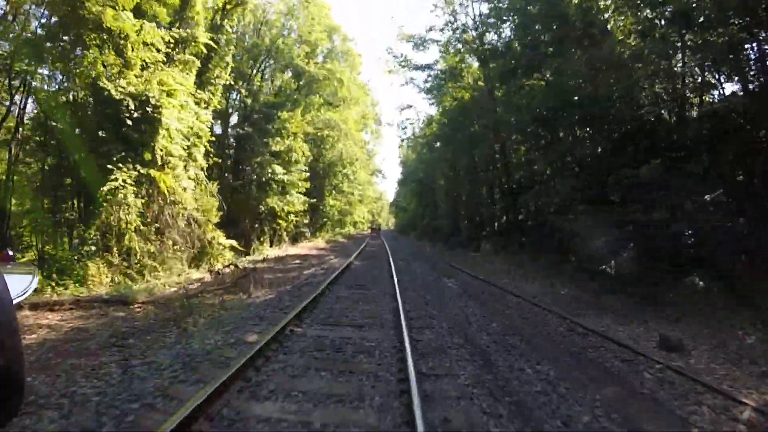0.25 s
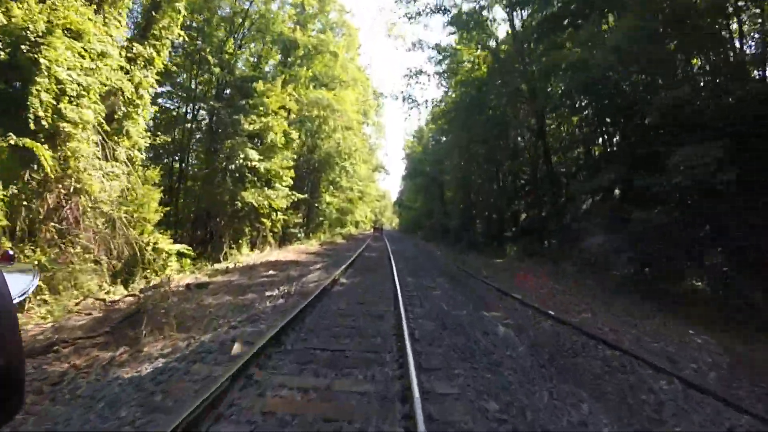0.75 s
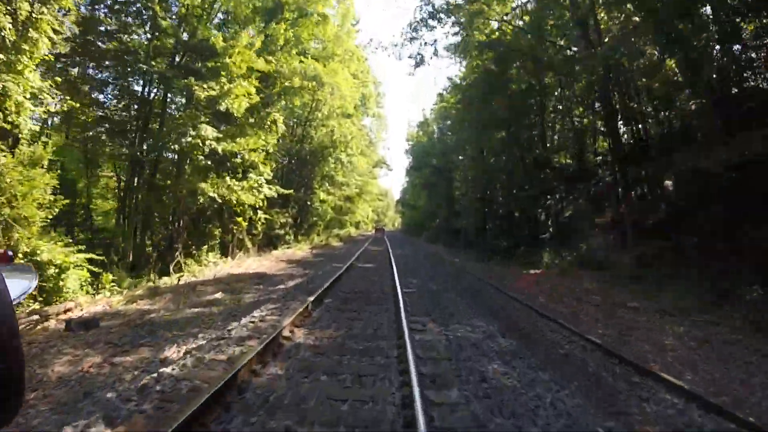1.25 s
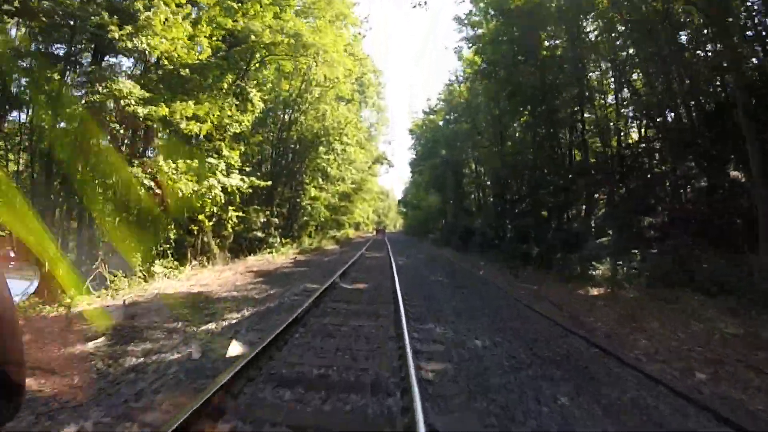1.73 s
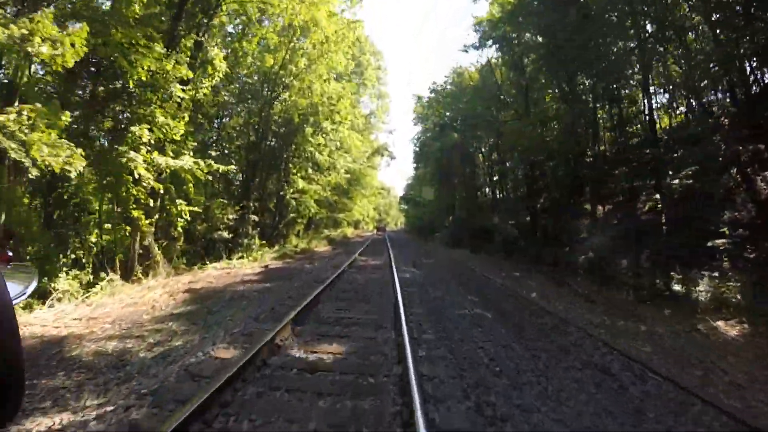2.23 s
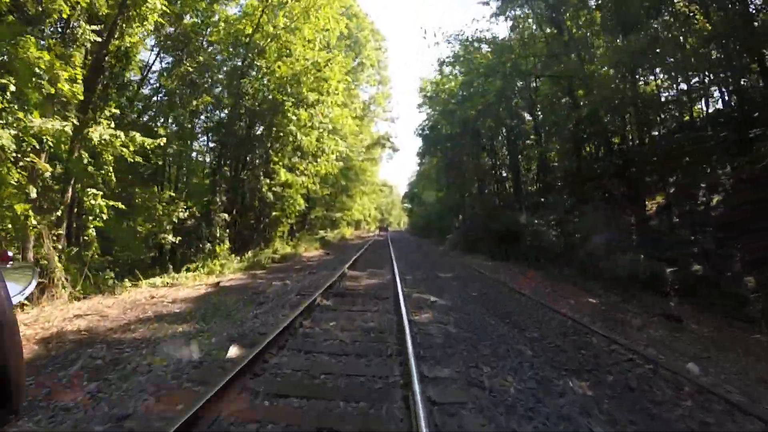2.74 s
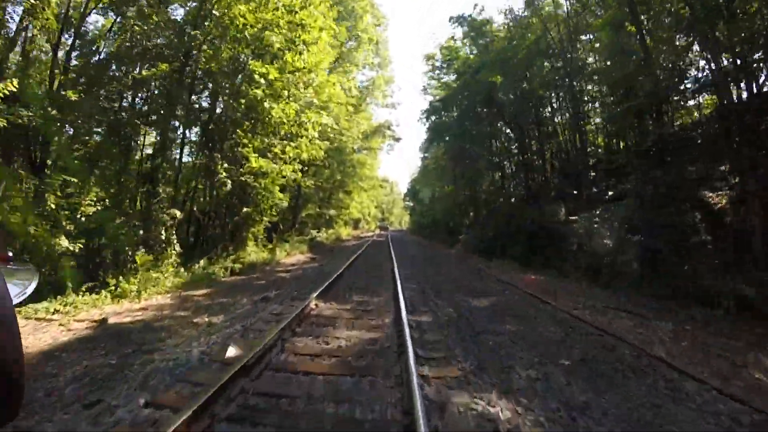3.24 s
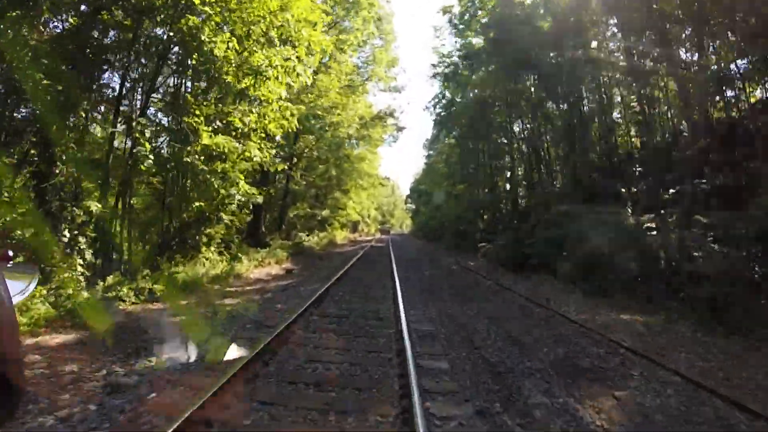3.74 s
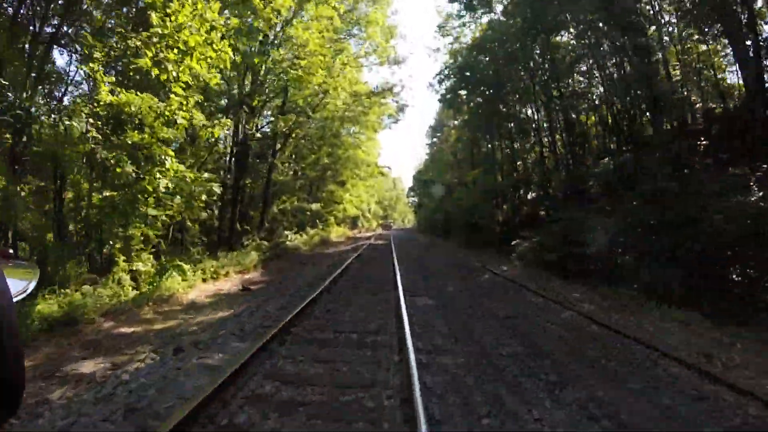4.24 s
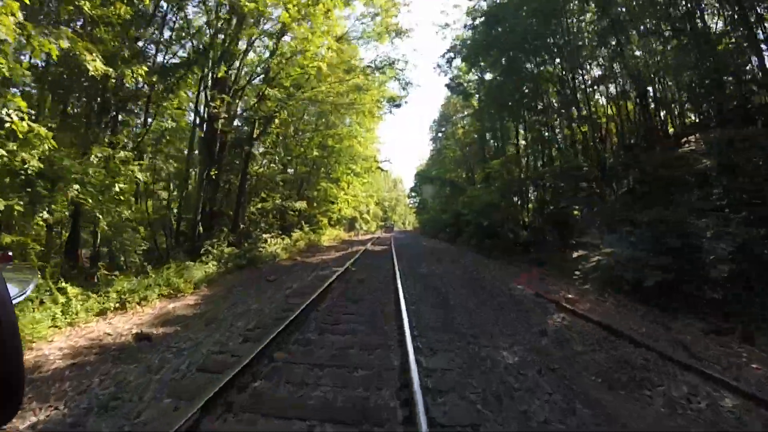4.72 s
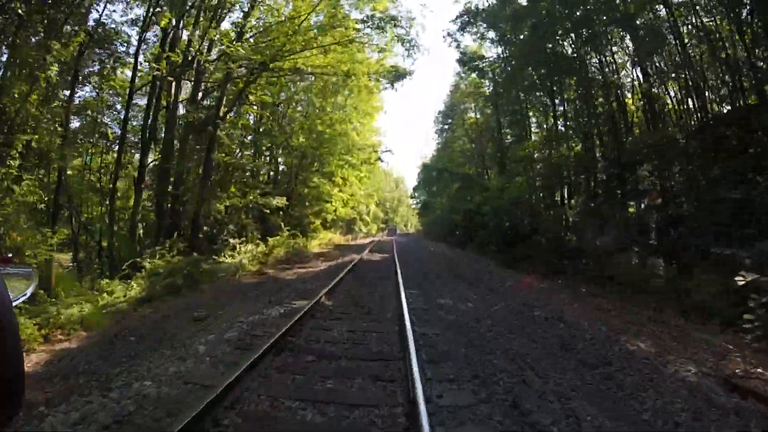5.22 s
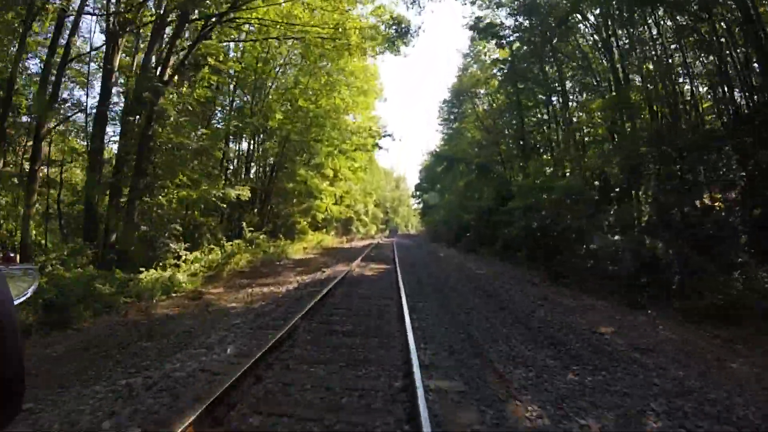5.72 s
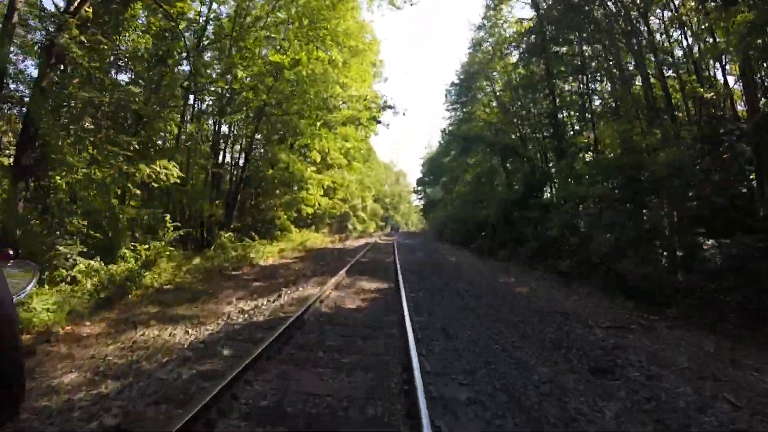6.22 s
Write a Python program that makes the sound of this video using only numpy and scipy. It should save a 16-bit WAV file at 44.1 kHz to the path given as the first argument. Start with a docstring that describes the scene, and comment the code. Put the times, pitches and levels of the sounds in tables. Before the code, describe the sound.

Steady chugging of a little motor rail car, about sixteen thuddy pops a second, over rumbling wheels, clattering sheet metal and rail-joint knocks.

```python
"""In the woods, on a small open rail car. A slow four-stroke engine fires about sixteen times a second:
each firing gives a low push of pressure and a short ring of the exhaust pipe. Steel wheels roar on the rails,
the frame shakes and rattles with every stroke, and both axles knock over the rail joints. Noise sent through
ringing filters makes most of these sounds. A closed housing around the microphone dulls the treble."""
import sys
import numpy as np
from scipy import signal
from scipy.fft import rfft, irfft
from scipy.io import wavfile
from scipy.ndimage import uniform_filter1d

SR = 44100
rng = np.random.default_rng(int(sys.argv[2]) if len(sys.argv) > 2 else 0)


def generate_wav(signal):
    """Clip the signal to [-1, 1] and save it as 16-bit WAV at the path in sys.argv[1]."""
    frames = np.transpose(np.atleast_2d(signal))
    scaled = np.clip(frames, -1, 1) * 32767
    pcm = np.round(scaled).astype(np.int16)
    wavfile.write(sys.argv[1], SR, pcm)


N = 285322   # length in samples


def from_db(db):
    """Turn decibels into a factor."""
    return 10 ** (np.asarray(db) / 20)


def rms_one(x):
    """Bring a signal to an rms level of 1."""
    return x / np.sqrt(np.mean(x ** 2) + 1e-20)


def in_time(rows):
    """Join the columns of a table by straight lines, one value a sample."""
    s, *columns = np.transpose(rows)
    return [np.interp(np.arange(N) / SR, s, column) for column in columns]


def at_hz(points, hz):
    """Read a (frequency, level) table at any frequency, along a log frequency scale."""
    known_hz, level_db = np.transpose(points)
    return np.interp(np.log(hz), np.log(known_hz), level_db)


def drift(rate_hz):
    """A slow random wander of spread 1, made at every 40th sample and joined by straight lines."""
    r = np.exp(-80 * np.pi * rate_hz / SR)
    slow = signal.lfilter([1], [1, -2 * r, r * r], rng.standard_normal(N // 40 + 2002))
    slow = rms_one(slow[2000:])   # leave out the filter's start
    return np.interp(np.arange(N) / 40, np.arange(len(slow)), slow)


def filtered(x, order, hz, kind):
    """Keep the part of a sound below, above or between the given frequencies."""
    return signal.sosfilt(signal.butter(order, hz, kind, fs=SR, output="sos"), x)


def ring(drive, hz, t60):
    """One tone of a struck or rubbed body, dying by 60 dB in t60 s; for noise, ring time hardly alters the level."""
    r, w = from_db(-60 / (t60 * SR)), 2 * np.pi * hz / SR
    return np.sqrt(1 - r) * signal.lfilter([0, np.sin(w)], [1, -2 * r * np.cos(w), r * r], drive + 1e-18)


def swelling_contacts(blows, peak_s):
    """Turn each blow into a short burst of noise that swells until peak_s, then dies; also return its pole."""
    r = np.exp(-1 / (peak_s * SR))
    return signal.lfilter([1], [1, -2 * r, r * r], blows) * rng.standard_normal(N), r


def firings_so_far():
    """Count the firings as a running number; the engine gains speed evenly."""
    first_firing_s, firings_per_s, speedup_per_s2 = 0.02225, 15.98303, 0.148969
    t = np.arange(N) / SR - first_firing_s
    return firings_per_s * t + speedup_per_s2 * t ** 2 / 2


def from_place(fired, place):
    """Distance from a place in the engine cycle, -0.5 to 0.5 cycles."""
    return (fired - place + .5) % 1 - .5


# Surges of rail growl and head wind: (time [s], growl level [dB], wind level [dB])
RIDE_SURGES = [(0, -27.5, -38), (.8, -31.5, -40), (1.7, -24.5, -44), (2.3, -32, -35.5), (3.2, -26, -41),
               (3.9, -25.5, -43), (4.4, -28, -32.5), (5.1, -28, -45.5), (5.4, -24, -33), (5.65, -24, -50),
               (6.2, -23, -43), (6.47, -22.5, -55)]


def wind():
    """Lumpy pressure of the head wind on the housing: very low noise in surges."""
    _, wind_db = in_time(RIDE_SURGES)
    return from_db(wind_db) * rms_one(filtered(rng.standard_normal(N), 2, [27, 40], "band"))


def rail_growl():
    """The rolling contact keeps a low tone of wheel and rail sounding in surges."""
    growl_db, _ = in_time(RIDE_SURGES)
    return from_db(growl_db + 1.9 * drift(4.0)) * rms_one(ring(rng.standard_normal(N), 287.6, 0.035))


# A thin plate sings briefly: (time [s], level [dB], length [s])
PLATE_PINGS = [(1.08, -51, .02), (1.18, -50, 0.011), (2.408, -53, .026)]


def pings():
    """The plate is rubbed for a moment; its tone rises and fades softly."""
    ping_hz = 3485
    t, drive = np.arange(N) / SR, 0
    for s, db, length_s in PLATE_PINGS:
        drive = drive + from_db(db) * ((t > s) & (t < s + length_s))
    return signal.lfilter([.01], [1, -.99], drive) * np.sin(2 * np.pi * ping_hz * t)


# Blows of the valve gear: (place after the firing [cycles], level before the contacts build up [dB])
VALVE_BLOWS = [(-.05, -77), (.45, -82)]
# Tones of the valve gear: (frequency [Hz], level [dB], ring time t60 [s])
VALVE_TONES = [(5040, -9, 0.0079), (6400, -11, 0.0054), (7500, -11, 0.0061), (8900, -13, 0.0063),
               (10300, -15, 0.0047)]


def valve_ticks(fired):
    """Twice a cycle the valve gear gives a few milliseconds of bright contacts, each time of another strength."""
    blows = np.zeros(N)
    for place, level_db in VALVE_BLOWS:
        at = np.flatnonzero(np.diff(np.floor(fired - place)) > 0)
        blows[at] = from_db(level_db + 1.1 * rng.standard_normal(len(at)))
    contacts, _ = swelling_contacts(blows, peak_s=.002)
    rings = sum(from_db(db) * ring(contacts, hz, t60) for hz, db, t60 in VALVE_TONES)
    return filtered(rings, 2, [4000, 10500], "band")


# Breath of the intake: (frequency [Hz], width [Hz], level before the valve shapes it [dB])
INTAKE_BREATH = [(665, 160, -35), (832, 190, -35), (1600, 250, -51.5)]


def intake(fired):
    """Air rushes through the intake while its valve is open."""
    opens, shuts = .5, .9   # cycles after the firing
    opening = np.sin(np.pi * np.clip((fired % 1 - opens) / (shuts - opens), 0, 1)) ** .5
    out = 0
    for hz, width_hz, db in INTAKE_BREATH:
        breath = rms_one(ring(rng.standard_normal(N), hz, 2.2 / width_hz))
        out = out + from_db(db + 2.0 * drift(12)) * opening * breath
    return out


# Dull clacks of the engine: (place after the firing [cycles], length [cycles], frequency [Hz], level [dB])
ENGINE_CLACKS = [(0.48, 0.082, 1700, -45.5), (.93, 0.026, 1300, -40.5), (0.98, 0.015, 820, -47.5),
                 (0.12, 0.035, 3100, -57.5)]


def clacks(fired):
    """Gear and valve play knock at fixed places of the cycle, now harder, now softer."""
    out = 0
    for place, length, hz, db in ENGINE_CLACKS:
        bump = np.exp(-(from_place(fired, place) / length) ** 2)
        knocking = rms_one(ring(rng.standard_normal(N), hz, 0.0038))
        out = out + bump * from_db(db + 1.1 * drift(7.1)) * knocking
    return out


def panel_buzz():
    """A panel chatters briefly after a knock: a short even run of ticks rings two tones."""
    start_s, length_s, ticks_per_s, level_db = 3.853, .036, 295, -27
    ticks, since = np.zeros(N), np.arange(0, length_s, 1 / ticks_per_s)
    strengths = np.sin(np.pi * since / length_s) ** .5
    ticks[((start_s + since) * SR).astype(int)] = from_db(level_db) * strengths
    return ring(ticks, 3400, .005) - ring(ticks, 4400, .005)


# A loose metal fitting jumps over the roughest joint: (time [s], level [dB])
FITTING_JUMPS = [(4.362, -49), (4.372, -45), (4.434, -53), (4.446, -48), (4.457, -48), (4.466, -49),
                 (4.475, -48), (4.484, -51), (4.492, -46), (4.518, -55)]
# Tones of the fitting: (frequency [Hz], level [dB], ring time t60 [s])
FITTING_TONES = [(4040, 2, .008), (4500, 1.5, 0.0093), (5240, 0, .008), (7600, -5, .012), (8860, -4, .012),
                 (9700, -9, .008), (10500, -9, .008), (12000, -15, .005)]


def fitting():
    """Each jump is a short scuff that strikes every tone of the fitting with a strength of its own."""
    s, jump_db = np.transpose(FITTING_JUMPS)
    chance, out = rng.standard_normal((len(s), len(FITTING_TONES))), 0
    for k, (hz, level_db, t60) in enumerate(FITTING_TONES):
        blows = np.zeros(N)
        blows[(s * SR).astype(int)] = from_db(jump_db + level_db + 3.2 * chance[:, k])
        contacts, r = swelling_contacts(blows, peak_s=.002)
        scuffs = contacts * (1 - r) * np.e   # the swell peaks at the strength of the blow
        out = out + ring(scuffs, hz, t60)
    return out


def stroke(fired, rise, fall, rebound, rebound_fall):
    """Shape of the shaking: a quick rise at the firing, a slower fall, a smaller blow a revolution later."""
    def hump(place, dies):
        off = from_place(fired, place)
        return np.exp(-(off / np.where(off < 0, rise, dies)) ** 2)
    return hump(-.045, fall) + rebound * hump(.5, rebound_fall)


# Lift of the noise per unit of stroke shape: (frequency [Hz], lift [dB])
STROKE_LIFT = [(200, 6), (380, 0.5), (520, -2.6), (800, 7.5), (2000, 1), (5000, 4), (10000, 6.5)]


def shaken(source, spectrum, peaks, shape, patchy_db):
    """Colour the source, then lift each half-octave band with the stroke and let it flicker; rms 1."""
    hz = np.maximum(np.fft.rfftfreq(N, 1 / SR), 1)
    level_db = at_hz(spectrum, hz)
    for centre, width, db in peaks:
        level_db = level_db + db / (1 + (2 * (hz - centre) / width) ** 2)
    coloured, out, together = rfft(source) * from_db(level_db), 0, drift(61)
    lowest_hz, highest_hz = spectrum[0][0], spectrum[-1][0]
    for centre in lowest_hz * 2 ** np.arange(0, np.log2(highest_hz / lowest_hz) + .5, .5):
        band = np.cos(np.pi * np.clip(np.log2(hz / centre), -.5, .5)) ** 2
        flicker_db = patchy_db * (0.65 * together + drift(25))   # partly shared by all bands
        gain_db = at_hz(STROKE_LIFT, centre) * (shape - shape.mean()) + flicker_db
        out = out + from_db(gain_db) * irfft(coloured * band, N)
    return rms_one(out)


def rattle_contacts(shape):
    """Loose parts tick against the frame, most often at the strokes, over an even hiss."""
    born = rng.random(N) < 900 * (shape + .15) / SR
    sizes = from_db(0.9 * np.minimum(rng.exponential(1, N), 4)) * rng.choice([-1, 1], N)
    return rms_one(born * sizes) * 0.13 + rng.standard_normal(N)


# Loose sheet metal: (frequency [Hz], level before the track changes it [dB], ring time t60 [s])
SHEET_TONES = [(1026, -53.5, 0.022), (1220, -53, 0.035), (1610, -52, 0.055), (2090, -57.5, 0.027),
               (2310, -60, .02), (2740, -64, .03), (3000, -70, 0.023), (3444, -71, 0.044),
               (4050, -69, 0.022)]


def sheets(shape):
    """The sheets are tapped together by chance, mostly at a stroke, each with its own strength, and ring on."""
    taps, out = rng.random(N) < 200 * (shape + .1) / SR, 0
    for hz, db, t60 in SHEET_TONES:
        blows = taps * from_db(3 * rng.standard_normal(N))   # strengths spread by 3 dB
        out = out + from_db(db) * rms_one(ring(ring(blows, hz, t60), hz, .006))
    return out


# The hardest shakes of the loose parts: (time the swell starts [s], level [dB])
HARD_SHAKES = [(.391, -39.5), (.58, -38.5), (1.075, -37), (1.192, -33.5), (1.567, -43.5), (2.0, -39),
               (2.063, -41.5), (2.309, -40), (2.41, -40), (2.774, -37.5), (2.977, -39), (3.08, -39),
               (3.445, -34.5), (3.709, -33.5), (3.805, -40), (4.79, -36), (4.83, -40.5), (5.0, -35),
               (5.1, -36), (5.144, -40.5), (5.31, -37), (5.42, -35.5), (5.562, -38), (5.628, -40),
               (5.746, -35), (5.974, -36.5), (6.076, -30), (6.099, -30.5), (6.156, -33), (6.269, -32.5),
               (6.371, -40)]


def shakes(clatter):
    """Hard shakes bring short bursts of the brighter part of the clatter."""
    rise_s, fall_s, bursts = .006, .014, 0
    for s, db in HARD_SHAKES:
        t = np.arange(N) / SR - s - rise_s
        bursts = bursts + from_db(db) * np.exp(-(t / np.where(t < 0, rise_s, fall_s)) ** 2)
    return bursts * rms_one(filtered(clatter, 2, 650, "high"))


# Unevenness of the track: (time [s], rattle level, used relative to its mean [dB], wheel roar level [dB])
TRACK_ROUGHNESS = [(0.0, -39, -16.5), (0.36, -41.5, -20), (0.72, -39, -18), (0.85, -42, -19.5),
                   (1.71, -40.5, -19), (1.89, -38, -19.5), (2.2, -41.5, -19.5), (2.72, -40, -21),
                   (3.03, -41, -20), (3.57, -39.5, -18), (3.96, -43, -22), (4.38, -38, -18.5),
                   (4.56, -43.5, -21.5), (5.46, -41.5, -20), (5.6, -44, -22), (6.47, -42, -18.5)]
# Colour of the rattle: (frequency [Hz], level [dB per Hz])
RATTLE_COLOUR = [(450, -35), (700, -1), (850, -11.5), (1050, -13.5), (1300, -16), (2000, -20), (2500, -32),
                 (3200, -34.5), (3700, -32.5), (5000, -32), (6300, -41.5), (8000, -44.5), (10000, -51),
                 (12000, -56), (13000, -62), (14500, -78.5)]
# Resonances and notches of the panels: (frequency [Hz], width [Hz], level [dB])
PANEL_PEAKS = [(1010, 110, 7), (1220, 71, 5), (1619, 240, 4.5), (2120, 24, 6.5), (2200, 60, 0.5),
               (2340, 62, 3), (2700, 700, 7), (3320, 200, -9), (3474, 120, 8.5), (4000, 90, 4),
               (4000, 70, -3), (6100, 85, 4), (7650, 200, -8), (8700, 160, -2.5)]


def loose_parts(shape, jolt):
    """Ticks and hiss, coloured by the panels, clatter with the strokes, the uneven track and the joint knocks."""
    rattle_db, _ = in_time(TRACK_ROUGHNESS)
    rattle_db = rattle_db - rattle_db.mean()
    clatter = shaken(rattle_contacts(shape), RATTLE_COLOUR, PANEL_PEAKS, shape, patchy_db=0.34)
    looseness = from_db(-37.5 + rattle_db + .8 * drift(9.3)) + from_db(-11.5) * jolt
    return looseness * clatter + shakes(clatter) + from_db(rattle_db) * sheets(shape)


# Colour of the wheel roar: (frequency [Hz], level [dB per Hz])
ROAR_COLOUR = [(12, -44), (20, -33.5), (55, -22), (100, -11.5), (233, -14), (329, -8.5), (409, -3.5),
               (498, -0.5), (665, -11.5), (841, -18), (1120, -44), (1500, -47), (1950, -63), (3300, -120)]
# Frame resonances in the roar: (frequency [Hz], width [Hz], level [dB])
FRAME_PEAKS = [(190, 41, 10.5), (361.4, 7.8, 9), (480, 390, -1), (680, 250, 1.5), (851.5, 64, 8)]


def wheel_roar(shape):
    """Steel wheels roll on uneven rails: noise coloured by the frame and shaken by the strokes."""
    _, roar_db = in_time(TRACK_ROUGHNESS)
    roar = shaken(rng.standard_normal(N), ROAR_COLOUR, FRAME_PEAKS, shape, patchy_db=1.2)
    return from_db(roar_db + .9 * drift(4.0)) * roar


# The frame thumps after a joint or a rough spot: (peak time [s], frequency [Hz], peak level [dB], fall [s])
FRAME_THUMPS = [(.146, 185, -17, .012), (1.084, 200, -20, 0.02), (1.691, 384, -12.5, 0.017),
                (1.872, 229, -12.5, 0.012), (1.946, 193, -14, 0.032), (2.004, 182, -13.5, 0.022),
                (2.22, 393, -13, 0.011), (2.966, 410, -13.5, .012), (3.088, 360, -10.5, 0.012),
                (3.183, 260, -12, 0.011), (3.417, 216, -15, 0.016), (3.827, 289, -6, 0.021),
                (3.979, 197, -11.5, 0.022), (4.079, 285, -20, .015), (4.37, 182, -16, .015),
                (4.442, 190, -14.5, 0.009), (4.475, 262, -12, 0.019), (4.738, 396, -12, 0.014),
                (5.752, 414, -14, .01), (5.763, 290, -13.5, .025), (5.9, 263, -16.5, 0.013),
                (6.046, 337, -11.5, 0.016), (6.288, 245, -14.5, 0.027), (6.386, 414, -10, 0.01),
                (6.408, 303, -14.5, 0.028), (6.45, 307, -9, 0.0092)]


def thumps():
    """A low tone of the frame swells quickly and dies."""
    rise_s, out = 0.008, 0
    for s, hz, db, fall_s in FRAME_THUMPS:
        t = np.arange(N) / SR - s
        swell_and_die = np.where(t < 0, np.exp(-(t / rise_s) ** 2), np.exp(-np.abs(t) / fall_s))
        out = out + from_db(db) * swell_and_die * np.sin(2 * np.pi * (hz * t + rng.random()))
    return out


# Wheels over rail joints:
# (time [s], level of the blow [dB], treble against it [dB], time to die by 60 dB, at least 0.02 [s])
RAIL_JOINTS = [(1.083, -27.5, -7.5, 0.12), (1.187, -28.5, -2, .028), (1.93, -36, -18, 0.11),
               (2.036, -40, 7, 0.019), (3.078, -30, -9, 0.039), (3.174, -33.5, -7, .065),
               (3.7, -29, -1, 0.14), (3.806, -22, -5, 0.072), (3.968, -34.5, -16, 0.085),
               (4.356, -33, 7, 0.055), (4.446, -28, -3, 0.12), (4.466, -26.5, -8, 0.042),
               (5.128, -32.5, -1, 0.039), (5.324, -37, -6, 0.11), (5.648, -31, 1.5, 0.08),
               (5.743, -19.5, -21, 0.059), (6.076, -22, -17, 0.032), (6.091, -47.5, -8, 0.04),
               (6.262, -46, -4, 0.098), (6.375, -36, -5, 0.11)]
# Tones of the wheel: (frequency [Hz], level [dB], ring time t60 [s])
WHEEL_TONES = [(533, 20.5, 0.032), (707, 5, 0.078), (835, 6.5, 0.065), (980, -11.5, 0.028),
               (1260, -9, 0.037), (1410, -12, 0.062), (1740, -18.5, .03), (2010, -11, 0.076),
               (2500, -20, 0.058), (3620, -26.5, 0.052)]


def joints():
    """Each knock is a clatter of blunt contacts that rings the wheel; also returns the jolt that stirs the rattle."""
    contacts_per_s, clatter_share = 900, 0.56   # the rest of the blow is even noise
    jolt, out = np.zeros((2, N))
    since = np.arange(SR // 3) / SR
    for s, peak_db, treble_db, t60 in RAIL_JOINTS:
        start = round(s * SR)
        count = min(len(since), N - start)
        burst = from_db(peak_db - 60 * (since / max(t60, .02)) ** 2) * (1 - np.exp(-since / 0.002))
        hits = (rng.random(len(since)) < contacts_per_s / SR) * np.sqrt(SR / contacts_per_s)
        contacts = burst * (np.sqrt(clatter_share) * hits + np.sqrt(1 - clatter_share))
        knock = np.zeros(len(since))
        for hz, level_db, ring_t60 in WHEEL_TONES:
            # the colour changes by chance from knock to knock
            db = level_db + treble_db * (hz > 950) + 5 * rng.standard_normal()
            tone = rms_one(ring(contacts * rng.standard_normal(len(since)), hz, ring_t60))
            knock += from_db(db) * np.std(burst) / 2 * tone
        out[start:start + count] += knock[:count]
        jolt[start:start + count] += burst[:count] * from_db(treble_db)
    return filtered(out, 3, 4360, "low"), jolt   # the blow of wheel on rail is blunt


def swell(hz, peak_s, rise_s, fall_s):
    """A tone under a bell-shaped swell: gas leaving as the valve opens and shuts; starts 20 ms before the firing."""
    t = np.arange(SR // 16) / SR - .02 - peak_s
    return np.exp(-(t / np.where(t < 0, rise_s, fall_s)) ** 2) * np.cos(2 * np.pi * hz * t)


# Low push of the exhaust: (multiple of the firing rate, rms level before dip and push gain [dB])
PUSH_TONES = [(2, -46), (3, -48.5), (4, -40.5), (5, -27.5), (6, -29), (7, -31), (8, -33), (9, -33.5),
              (10, -37.5), (11, -39.5), (12, -40), (13, -43.5)]


def exhaust_push(fired):
    """Each firing gives one low pressure cycle; a reflection under the car cancels multiples near one pitch."""
    dip_hz, dip_width_hz, dip_db = 91.6, 10.7, -13
    lead_cycles, skew_radians = .011, .9   # the push is centred just ahead of the firing
    rate_hz, push = np.gradient(fired) * SR, 0
    for order, db in PUSH_TONES:
        lost_db = dip_db / (1 + (2 * (order * rate_hz - dip_hz) / dip_width_hz) ** 2)
        phase = 2 * np.pi * order * (fired + lead_cycles) - skew_radians
        push = push - np.sqrt(2) * from_db(db + lost_db) * np.sin(phase)
    return from_db(1.5 + 0.8 * drift(11.0)) * push


# Rings of the exhaust pipe:
# (frequency [Hz], level against the strongest ring [dB], peak after the firing [s], rise [s], fall [s])
PIPE_RINGS = [(500, 0, -.0045, .0029, .0068), (505, -17, .0056, .003, .003), (480, -13, .013, .004, .004),
              (690, -17, -.0042, .003, .002), (690, -19, .004, .0025, .0035), (860, -24, .001, .0015, .009),
              (280, -23, .002, .003, .009)]


def exhaust_pipe(fired):
    """Each firing sets the pipe ringing, every ring with a strength of its own."""
    strongest_db, spread_db, jitter_s = -6, .8, .00027   # jitter: spread of the moment of ignition
    at = np.flatnonzero(np.diff(np.floor(fired), prepend=-1) > 0)
    chance = rng.standard_normal((len(at), len(PIPE_RINGS) + 1))
    at = np.clip(at + (chance[:, -1] * jitter_s * SR).astype(int), 0, N - 1)
    lead, out = round(.02 * SR), 0   # the swell starts this many samples early
    for k, (hz, db, *timing) in enumerate(PIPE_RINGS):
        ring_spread_db = spread_db * (2 if k else 1)   # the weaker rings change twice as much
        firings = np.zeros(N)
        firings[at] = from_db(strongest_db + db + ring_spread_db * chance[:, k])
        out = out + signal.fftconvolve(firings, swell(hz, *timing))[lead:N + lead]
    return out


def scene():
    """Add up the ride, from the wind to the exhaust; strokes and joint knocks stir the loose parts."""
    fired = firings_so_far()
    shape = stroke(fired, rise=0.03, fall=0.13, rebound=0.22, rebound_fall=0.22)   # in cycles; rebound a factor
    knocks, jolt = joints()
    engine_details = valve_ticks(fired) + intake(fired) + clacks(fired)
    metal = pings() + panel_buzz() + fitting() + loose_parts(shape, jolt)
    wheels = rail_growl() + wheel_roar(shape) + thumps() + knocks
    exhaust = exhaust_push(fired) + exhaust_pipe(fired)
    return (wind() + engine_details + metal + wheels + exhaust)[None]


def gain_control(x):
    """Loud stretches pull the gain down at once; it creeps back."""
    threshold_db, share_taken_off, recover_db_per_s = -12.5, 0.4, 5
    recovered_db = recover_db_per_s * np.arange(N) / SR
    level_db = 10 * np.log10(uniform_filter1d(x ** 2, size=2600) + 1e-12)
    held_db = np.maximum.accumulate(level_db + recovered_db, axis=-1) - recovered_db
    return x * from_db(-share_taken_off * np.maximum(held_db - threshold_db, 0))


def record(dry):
    """The housing dulls the treble; soft rounding, gain control, bass cut, the highest peaks rounded, top cut."""
    dulled = filtered(dry, 4, 12700, "low")
    rounded = 2.35 * np.tanh(dulled / 2.616)
    heard = filtered(gain_control(rounded), 3, 25, "high")
    heard = heard / (1 + heard ** 8) ** (1 / 8) * .98
    return signal.sosfilt(signal.cheby2(12, 70, 15600, fs=SR, output="sos"), heard)


dry = scene()
out = record(dry)
generate_wav(out)
```